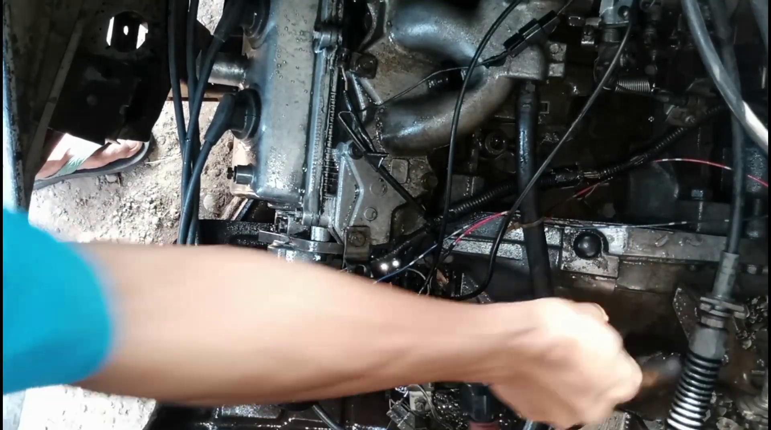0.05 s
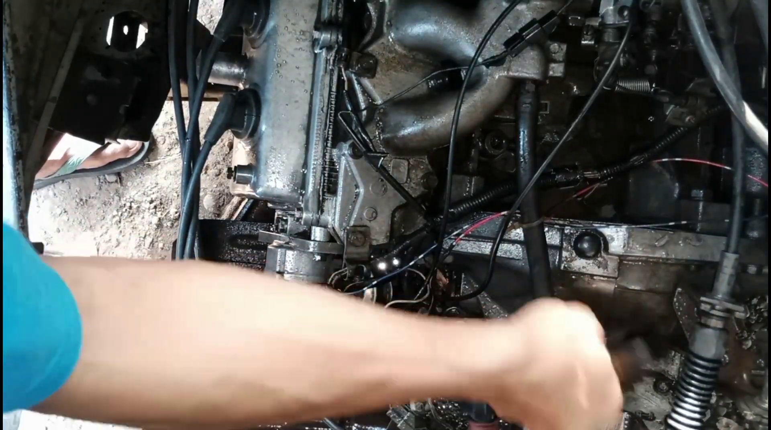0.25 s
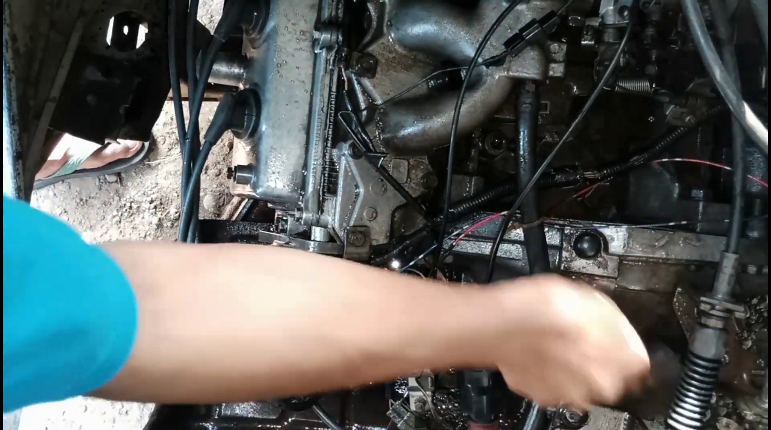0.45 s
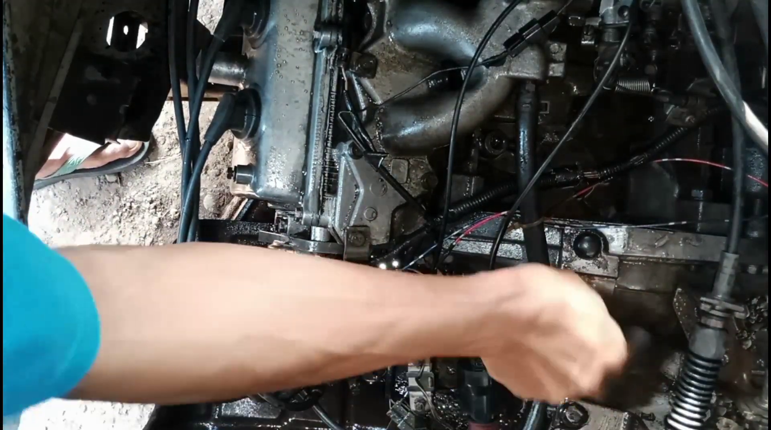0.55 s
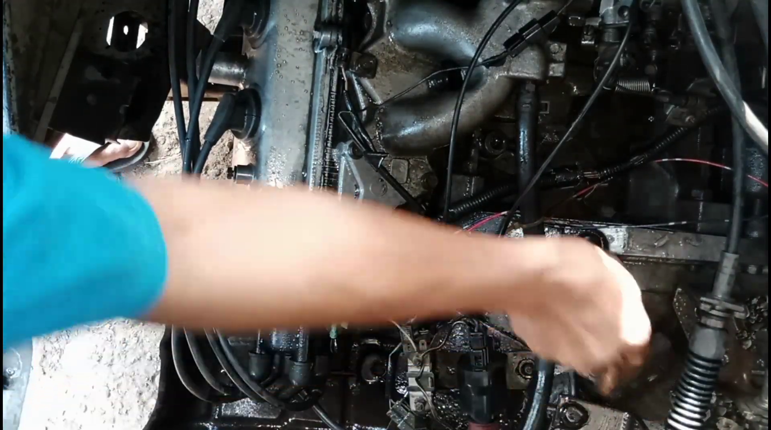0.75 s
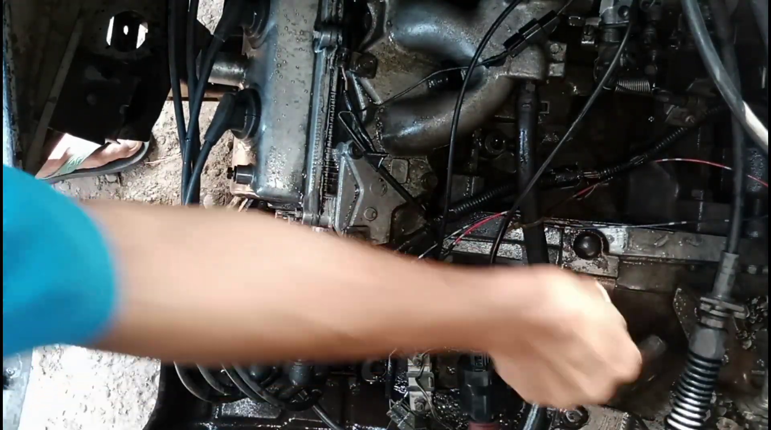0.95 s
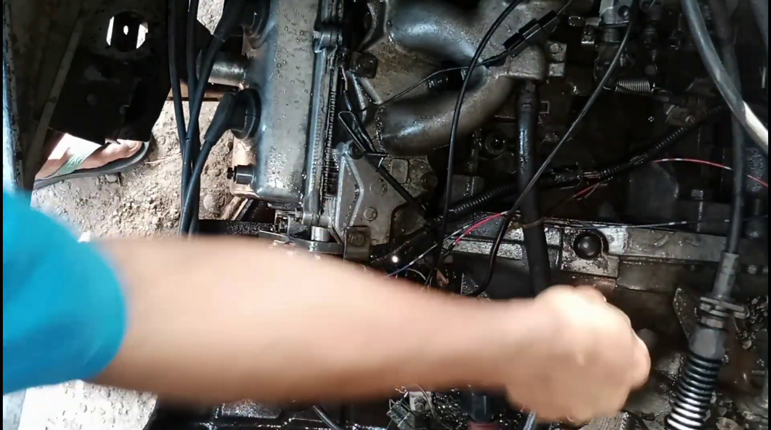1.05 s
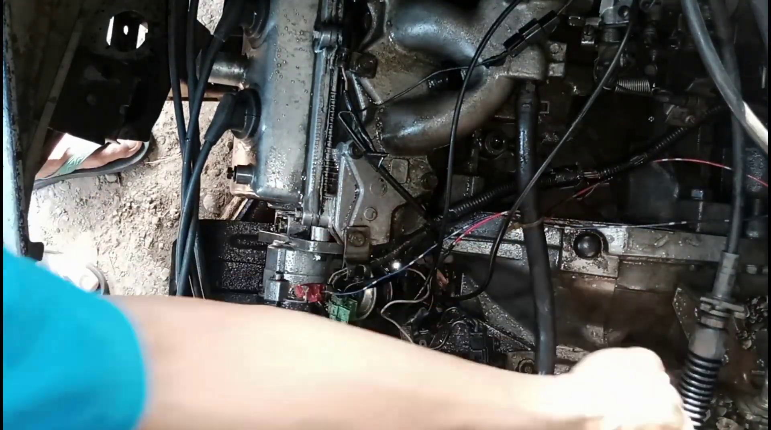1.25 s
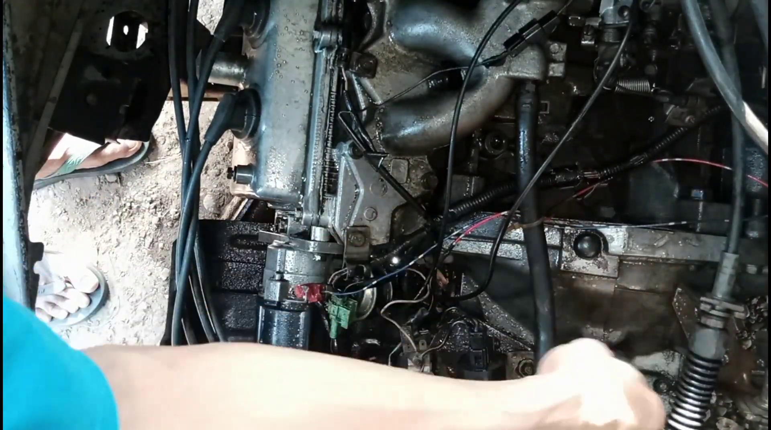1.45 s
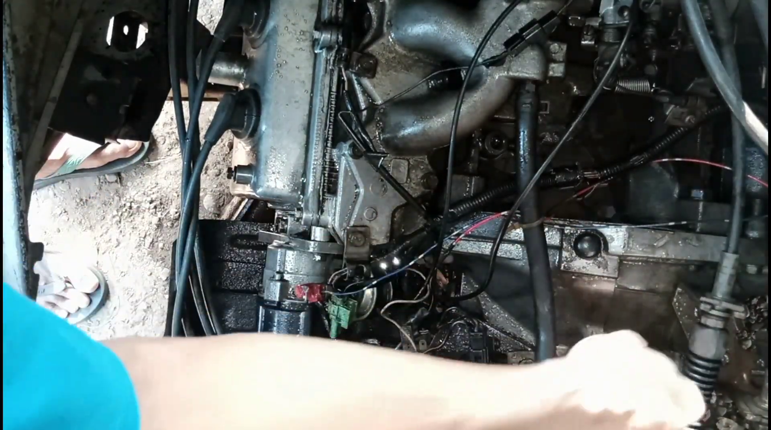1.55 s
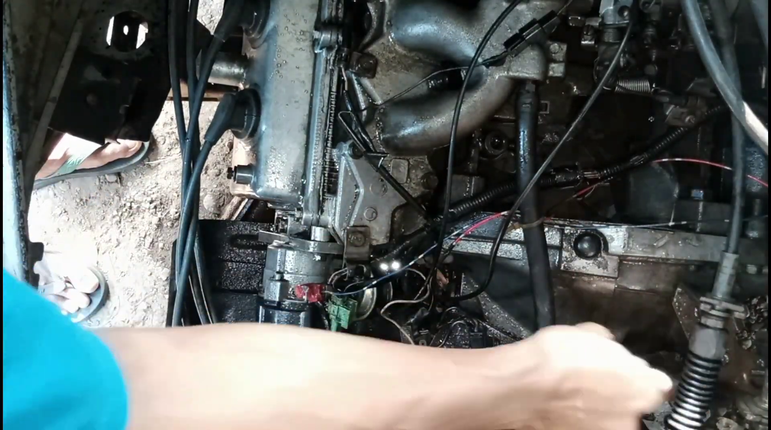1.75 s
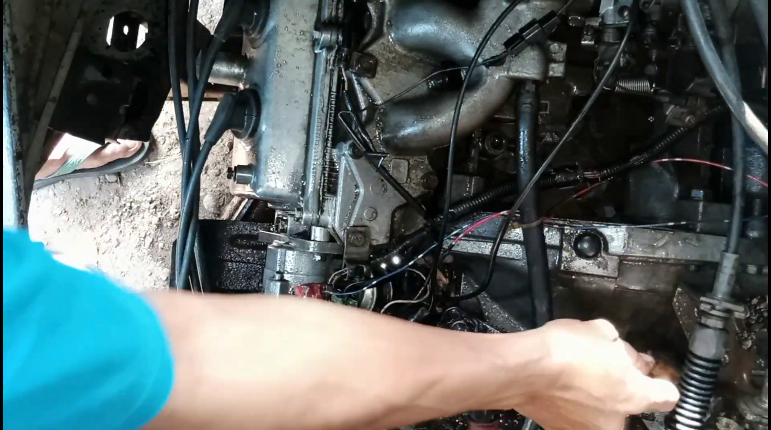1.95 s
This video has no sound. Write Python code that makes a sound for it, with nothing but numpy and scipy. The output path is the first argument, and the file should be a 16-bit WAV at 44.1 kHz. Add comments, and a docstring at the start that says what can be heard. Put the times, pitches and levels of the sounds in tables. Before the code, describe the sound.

A paintbrush scrubs oily engine parts close up, starting with soft swishes and turning to short, gritty strokes from 0.2 seconds. Its metal band clinks against the parts, loudest around 0.65 and 0.95 seconds, followed by a wet bristle rasp at 1 second. Scrubbing continues to 2 seconds, with more taps near 1.2, 1.5 and 1.7. A faint wavering low hum and quiet outdoor air lie underneath.

```python
"""Soft, close swishes come first, over a faint wavering hum and quiet outdoor air.
They are a paintbrush scrubbing oily grime off engine parts in short strokes.
Bristles hiss and rasp, and grit scrapes the metal: each is a stream of tiny clicks.
The brush's metal band (its ferrule) knocks against the parts and makes them ring.
The cramped engine bay sends back quick echoes."""
import sys
import numpy as np
from scipy import signal
from scipy.fft import rfft, irfft
from scipy.io import wavfile
from scipy.ndimage import map_coordinates

SR = 44100
rng = np.random.default_rng(int(sys.argv[2]) if len(sys.argv) > 2 else 0)


def dump_mix(stems):
    """Bounce the given channels to the path in sys.argv[1] as a 16-bit WAV at rate SR."""
    frames = np.atleast_2d(stems).T  # one column per channel
    limited = np.clip(frames, -1, 1)  # hard clip at full scale
    pcm = np.round(limited * 32767).astype(np.int16)
    wavfile.write(sys.argv[1], SR, pcm)


N = 88200
T = np.arange(N) / SR


def amp(db):
    """Turns decibels into a number to multiply by."""
    return 10 ** (np.asarray(db) / 20)


def unit(x):
    """Scales a signal to an average (rms) level of 1."""
    return x / np.sqrt(np.mean(x ** 2) + 1e-20)


def add(mix, start_s, sound):
    """Mixes a sound in at the given time."""
    part = mix[max(round(start_s * SR), 0):][:len(sound)]
    part += sound[:len(part)]


def shape(x, points, size=4096):
    """Turns frequencies up or down along (frequency [Hz], level [dB]) points."""
    hz, db = np.transpose(points)
    log_hz = np.log(abs(np.fft.fftfreq(size, 1 / SR)) + 1)
    log_gain = np.log(amp(np.interp(log_hz, np.log(hz), db)))
    response = np.exp(np.conj(signal.hilbert(log_gain)))  # never rings ahead of a click
    taps = np.fft.ifft(response).real[:size // 2]
    return signal.fftconvolve(x, taps)[:len(x)]


def colour(x, points):
    """Like shape, but white noise keeps its overall level."""
    return shape(x, points) / np.linalg.norm(shape(signal.unit_impulse(SR // 16), points))


def drift(rate_hz):
    """A smooth random wobble; a higher rate wobbles faster."""
    keep_slow = np.exp(-(np.fft.rfftfreq(N, 1 / SR) / rate_hz) ** 2)
    return unit(irfft(rfft(rng.standard_normal(N)) * keep_slow, N))


def clicks(per_s, spread_db):
    """Tiny random clicks of uneven size."""
    size = amp(spread_db * np.minimum(rng.exponential(1, N), 4))
    return unit(size * rng.choice([-1., 1.], N) * (rng.random(N) < per_s / SR))


def grit():
    """The coarse crackle behind scrapes, rubs and rasps."""
    return clicks(per_s=4100, spread_db=5.5)


STROKE_DROP_DB, STROKE_CURVE = 20.5, 1.35  # a stroke sinks this far over its rise or fall time
CLUMP_DB, CLUMP_HZ = 1.72, 240
GLANCE_S, GLANCE_SWING, GLANCE_GAIN, GLANCE_HZ = 0.000604, 0.23, 0.45, 6.97
# Tone of the bristle swish, gritty scrape and hollow rub: (frequency [Hz], level [dB])
SWISH_TONE = [(300, -35), (1000, -29), (1500, -17), (3000, -5), (4600, -8), (6400, 0.5), (7800, -5.5),
              (9400, -3.5), (11000, -12.5), (13500, -23), (15200, -6)]
SCRAPE_TONE = [(200, -56), (500, -13.5), (800, 0), (1100, 3), (1500, -0.5), (2000, -7.5), (3200, -10),
               (5000, -11), (9000, -38), (16000, -37)]
RUB_TONE = [(80, -15.5), (200, -3), (300, -9), (400, 4.5), (530, 5.5), (720, -2.5), (1200, -24.5),
            (4000, -62.5)]
# Brush strokes: (time of hardest push [s], rise [s], fall [s], swish [dB], scrape [dB], rub [dB])
BRUSH_STROKES = [ (.005, 0.055, 0.039, -52, -73, -63), (0.066, 0.031, 0.021, -56, -90, -67),
                 (.117, 0.018, 0.023, -54.5, -89, -70), (.185, 0.02, 0.091, -55, -90, -68),
                 (0.222, 0.013, 0.059, -38.5, -32, -43), (0.248, 0.037, 0.05, -48, -51, -44.5),
                 (0.343, 0.027, 0.034, -44, -39, -47.5), (0.394, 0.087, 0.068, -40, -59, -54),
                 (0.536, 0.016, 0.06, -40.5, -48, -46), (0.631, 0.04, 0.058, -45.5, -45.5, -46),
                 (0.685, 0.084, 0.033, -39.5, -44.5, -47), (0.749, 0.1, 0.038, -50.5, -46, -48.5),
                 (0.788, 0.048, 0.052, -40.5, -37, -43.5), (0.848, 0.13, 0.075, -50, -64.5, -60.5),
                 (0.95, 0.034, 0.053, -46.5, -68, -63), (0.988, 0.023, 0.047, -35.5, -37, -44),
                 (1.117, 0.039, 0.036, -41.5, -36.5, -39), (1.184, 0.026, 0.015, -48, -50, -49.5),
                 (1.226, 0.055, 0.028, -41, -77, -86), (1.287, 0.079, 0.032, -43.5, -56.5, -67),
                 (1.373, 0.083, 0.027, -49, -88, -97), (1.417, 0.021, 0.034, -50, -45.5, -37.5),
                 (1.497, 0.081, 0.052, -37, -51.5, -51.5), (1.535, 0.028, 0.042, -35, -52.5, -71),
                 (1.633, 0.051, 0.054, -51, -83, -85), (1.731, 0.039, 0.029, -40, -77.5, -76.5),
                 (1.753, 0.022, 0.062, -46, -45, -37), (1.845, 0.064, 0.056, -47, -56, -52),
                 (1.934, 0.023, 0.027, -44, -53.5, -73), (1.967, 0.013, 0.028, -43, -65, -50)]


def brushing():
    """Each stroke swells and fades, driving bristle hiss, grit on metal and a hollow rub."""
    power = np.zeros((3, N))
    for peak_s, rise, fall, *levels_db in BRUSH_STROKES:
        from_peak = np.maximum((peak_s - T) / rise, (T - peak_s) / fall)
        power += amp(np.array(levels_db)[:, None] - STROKE_DROP_DB * from_peak ** STROKE_CURVE) ** 2
    clumps = unit(amp(CLUMP_DB * drift(CLUMP_HZ)))  # bristles catch and let go in clumps
    swish, scrape, rub = np.sqrt(power) * clumps
    hiss = colour(swish * clicks(per_s=18000, spread_db=4), SWISH_TONE)
    # The hiss glances off the metal beside the moving brush.
    delay = GLANCE_S * (1 + GLANCE_SWING * drift(GLANCE_HZ))
    glance = map_coordinates(hiss, [(T - delay) * SR])
    hiss = (hiss + GLANCE_GAIN * glance) / np.hypot(1, GLANCE_GAIN)
    # Grit sets the metal ringing and also scratches dryly.
    ring = metal_ring()
    ringing = signal.fftconvolve(scrape * grit(), ring / np.linalg.norm(ring))[:N]
    scratching = colour(scrape * grit(), SCRAPE_TONE)
    rubbing = colour(rub * grit(), RUB_TONE)
    return hiss + amp(-3) * scratching + amp(-3.5) * ringing + rubbing


# Notes of the metal band and engine part: (pitch [Hz], level [dB], time to fade 60 dB [s])
METAL_NOTES = [(404, -41, 0.013), (539, -18, 0.024), (783, -13.5, 0.047), (1021, -10, 0.027),
               (1187, -5, 0.0084), (1469, -8, 0.015), (1372, -7.5, 0.014), (1670, -26, 0.033),
               (2040, -30, 0.022), (2160, -17.5, 0.015), (2350, -38, 0.014), (3295, -19, 0.03),
               (4440, -46, 0.024)]


def metal_ring(pitch=1, rise_s=0.000061, low_cut_hz=444):
    """One tap makes the metal ring with many short notes at once."""
    t = T[:SR // 8]
    ring = sum(amp(db - 60 * t / fade_s) * np.cos(2 * np.pi * hz * pitch * t)
               for hz, db, fade_s in METAL_NOTES)
    low_cut = signal.butter(2, low_cut_hz, "high", fs=SR)
    return signal.lfilter(*low_cut, ring * (1 - np.exp(-t / rise_s)))


# Slips of wet bristles: (time [s], half length [s], pitch [Hz], level [dB])
BRISTLE_SLIPS = [(0.005, 0.068, 3280, -59), (0.063, 0.01, 3600, -64), (0.215, 0.011, 2390, -40),
                 (0.991, 0.037, 2700, -37.5), (0.993, 0.021, 1620, -38), (1.925, 0.026, 4040, -48),
                 (1.935, 0.011, 1510, -50)]


def rasps(width=0.34):
    """Wet bristles slip and rasp in a narrow band; its width is a share of the pitch."""
    out = np.zeros(N)
    for peak_s, half_s, hz, db in BRISTLE_SLIPS:
        band = signal.butter(2, [hz * (1 - width / 2), hz * (1 + width / 2)], "band", fs=SR)
        rasp = unit(signal.lfilter(*band, grit()))
        out += rasp * amp(db - STROKE_DROP_DB * ((T - peak_s) / half_s) ** 2)
    return out


# Echoes from nearby parts: (delay [s], strength [ratio])
BAY_ECHOES = [(.00205, 0.084), (.00275, 0.063), (.00395, 0.25), (.008, 0.08)]


def engine_bay(x, tail_db, fade_s=0.081):
    """Sound bounces around the cramped bay: a few close echoes and a short scattered tail."""
    t = T[:SR // 4]
    tail = rng.standard_normal(len(t)) * amp(-60 * t / fade_s) * np.minimum(t / 0.003, 1)
    response = amp(tail_db) * tail / np.linalg.norm(tail)
    for delay, gain in [(0.00063, 0.9)] + list(BAY_ECHOES):  # the direct sound, then its echoes
        add(response, delay, np.array([gain]))
    return signal.fftconvolve(x, response / np.linalg.norm(response))[:N]


# The hum's two tones: (pitch [Hz], pitch wobble [Hz], level [dB])
HUM_TONES = [(99.4, 9.6, -3), (176.5, 11.9, -14.5)]
# How the hum swells and sinks: (time [s], level [dB])
HUM_SWELLS = [(0, -55), (.15, -49.5), (.22, -63), (.43, -60.5), (.48, -39.5), (.56, -52), (.61, -40),
              (.66, -52.5), (.73, -42), (.85, -58.5), (.93, -60.5), (.98, -54.5), (1.03, -64), (1.08, -42),
              (1.16, -53), (1.33, -67), (1.4, -57.5), (1.47, -45.5), (1.57, -38.5), (1.61, -53.5),
              (1.645, -39), (1.68, -49.5), (1.77, -52.5), (1.83, -45), (1.89, -51), (1.94, -41.5),
              (2, -45.5)]


def hum(wobble_hz=17.45, flutter=0.31):
    """A faint low hum wavers in pitch and level."""
    tones = np.zeros(N)
    for hz, swing_hz, db in HUM_TONES:
        level = 1 + flutter * drift(wobble_hz)
        pitch_hz = hz + swing_hz * drift(wobble_hz)
        tones += amp(db) * unit(level * np.sin(2 * np.pi * np.cumsum(pitch_hz) / SR))
    return amp(np.interp(T, *np.transpose(HUM_SWELLS))) * tones


# Tone of the outdoor air: (frequency [Hz], level [dB])
AIR_TONE = [(20, -8.5), (40, -13), (62, 5.5), (110, 12), (185, -0.5), (260, -13), (700, -21.5),
            (1000, -22.5), (1500, -28), (5000, -24), (12000, -35), (16000, -39)]


def air(level_db=-55.5):
    """The outdoor background is a quiet, steady, low rush."""
    return amp(level_db) * unit(colour(rng.standard_normal(N), AIR_TONE))


TICK_DB, TICK_FADE_S, CRACK_DB, CRACK_FADE_S, TICK_RISE_S = -20.5, 0.037, -7, 0.0031, 0.00029
KNOCK_BANDS_HZ = [600, 900, 1600, 2200, 3400, 5500]
# Tone of a knock's bright tick: (frequency [Hz], level [dB])
TICK_TONE = [(900, -42), (2000, -4.5), (3300, -2.5), (4500, 2), (6000, 2.5), (8500, -2.5), (11000, -12.5),
             (13500, -27.5), (15500, -11.5)]
# Knocks of the metal band; the last three columns turn part of the knock up or down:
# (time [s], level [dB], pitch [ratio], thud [dB], high ring [dB], tick [dB])
BRUSH_KNOCKS = [ (0.2113, -20.5, 1.13, -6, 2, -2.5), (.3345, -36, 1.2, -9, -3, -2),
                (0.3745, -16, 0.97, 0.5, -5.5, -7), (0.407, -19.5, 0.96, 3, 2, -31),
                (0.5278, -26, 0.98, 12.5, -1, -2), (0.55, -27, 1.0, 12.5, -2, 4),
                (0.615, -12.5, 0.97, -0.5, -9, -5), (0.6439, -5.5, 1.042, -4.5, -10, -10.5),
                (0.668, -1, 1.03, -4, -4, -2.5), (0.7288, -18, 0.94, -4, -17, -7),
                (0.9562, -1.5, 1.03, -16, 0, -5.5), (0.9787, -25, 1.2, -2, 14, 9),
                (0.9858, -25, 1.9, -13, 5, 16.5), (1.0824, -37, 1.13, 20.5, 9, 12.5),
                (1.2368, -14, 1.0, 3, -2.5, 4), (1.4027, -12.5, 0.98, -9, 3, 3),
                (1.4347, -23.5, 0.96, -2, 8.5, 8.5), (1.4964, -9, 0.91, -1, -1.5, -3.5),
                (1.7359, -15.5, 0.92, 7, 9.5, 10), (1.7387, -23.5, 0.77, 3.5, 0.5, 16)]


def knocks():
    """The metal band hits a part with a ring and a tick; each spot has its own tone and echo tail."""
    out, t = np.zeros(N), T[:SR // 8]
    fade = amp(TICK_DB - 60 * t / TICK_FADE_S) + amp(CRACK_DB - 60 * t / CRACK_FADE_S)
    fade *= 1 - np.exp(-t / TICK_RISE_S)
    for start_s, db, pitch, thud_db, high_db, tick_db in BRUSH_KNOCKS:
        tick = colour(fade * rng.standard_normal(len(t)), TICK_TONE)
        spot_tone = list(zip(KNOCK_BANDS_HZ, [thud_db, 0, 0, high_db, high_db, tick_db]))
        knock = shape(amp(-3.5) * metal_ring(pitch) + tick, spot_tone)
        add(out, start_s, amp(db) * engine_bay(knock, tail_db=-7.5))
    return out


# Notes of other engine parts: (time [s], pitch [Hz], level [dB], time to fade 60 dB [s])
PART_NOTES = [(.5283, 2800, -21.5, 0.01), (.5283, 3200, -30, 0.007), (.529, 1160, -31.5, 0.027),
              (.53, 263, -50, 0.25), (.5497, 3010, -18.5, 0.015), (.5497, 2720, -27.5, 0.023),
              (.5497, 4030, -24, 0.0088), (1.082, 6830, -37, 0.021), (1.2369, 2460, -19, .012),
              (1.4967, 2380, -16, 0.014), (1.4972, 1284, -8.5, 0.013), (1.4967, 6410, -25, 0.024),
              (1.741, 288, -32, 0.093), (1.739, 330, -37.5, 0.16)]


def part_rings(rise_cycles=0.94):
    """Other parts ring when the brush lands on them, building up over a vibration or two."""
    out, t = np.zeros(N), T[:SR // 4]
    for start_s, hz, db, fade_s in PART_NOTES:
        rise = 1 - np.exp(-t * hz / rise_cycles)
        add(out, start_s, amp(db - 60 * t / fade_s) * rise * np.sin(2 * np.pi * hz * t))
    return out


def scene():
    """Brushing and knocks echo in the engine bay, over hum and air."""
    cleaning = engine_bay(brushing() + rasps() + part_rings(), tail_db=-9) + knocks()
    return (cleaning + hum() + air())[None]


def record(dry):
    """Trims away the very highest treble, above 15750 Hz."""
    treble_cut = signal.firwin(401, 15750, window=("kaiser", 8), fs=SR)
    return signal.oaconvolve(dry, treble_cut[None], "same")


dry = scene()
out = record(dry)
dump_mix(out)
```